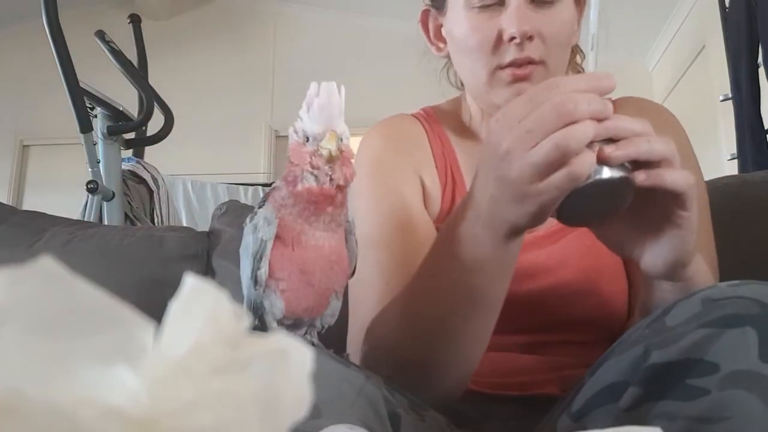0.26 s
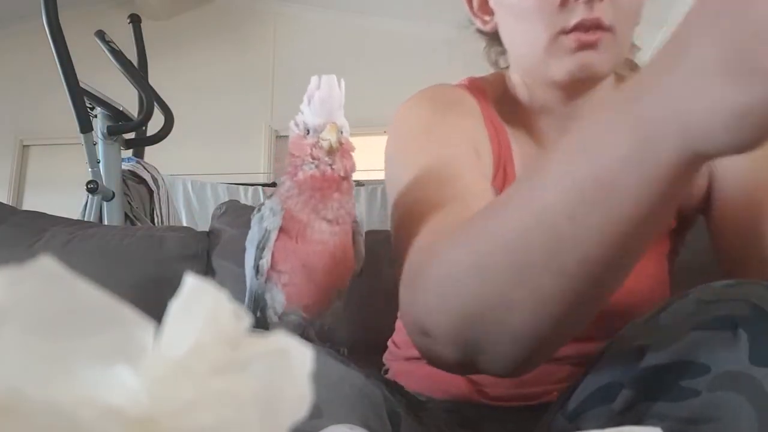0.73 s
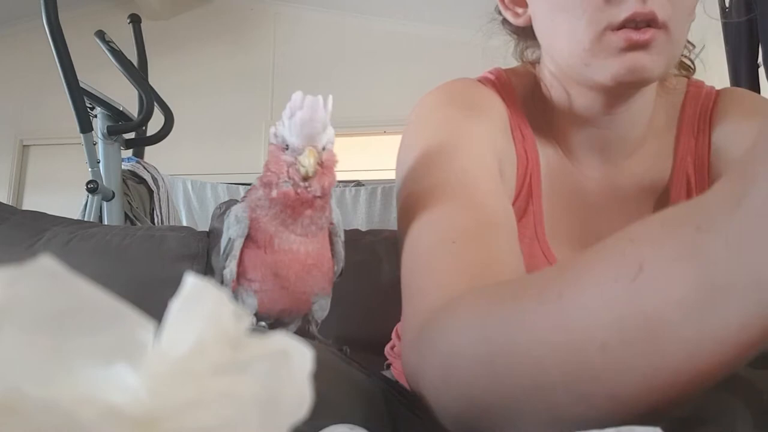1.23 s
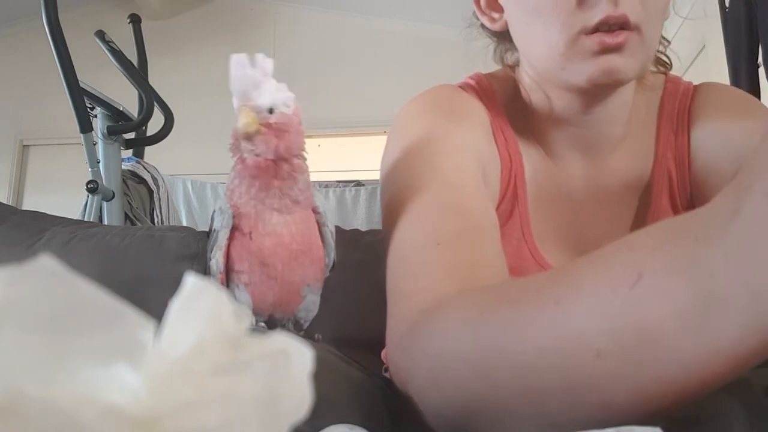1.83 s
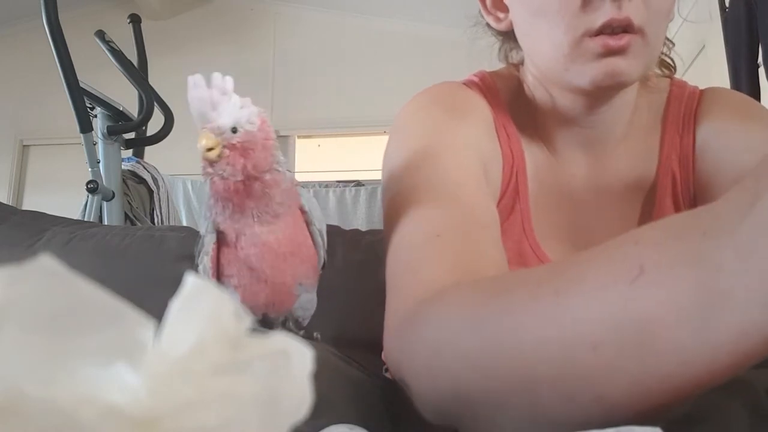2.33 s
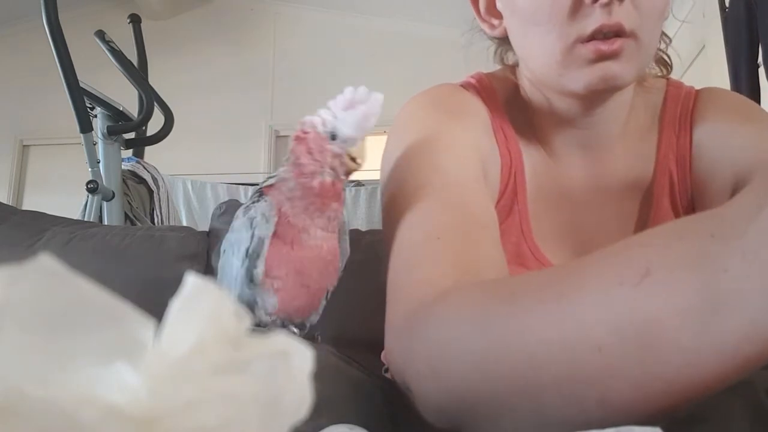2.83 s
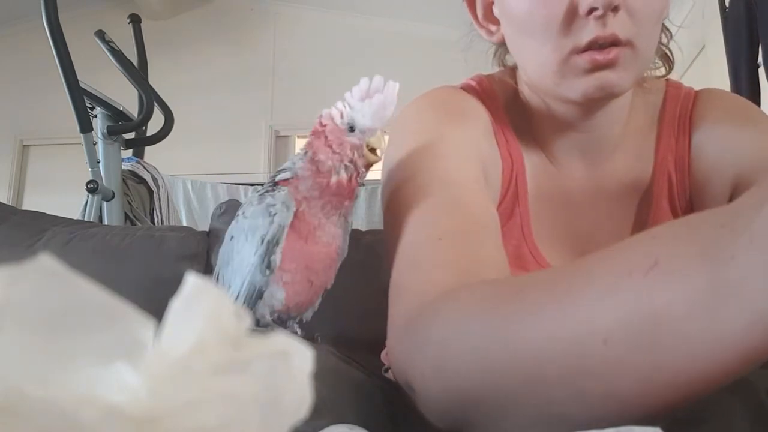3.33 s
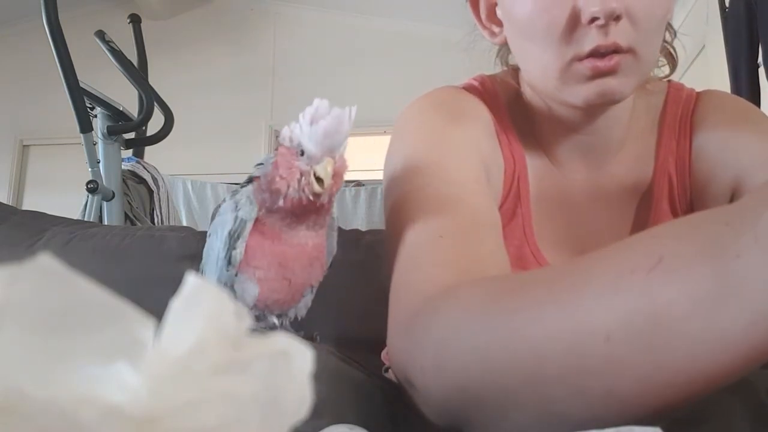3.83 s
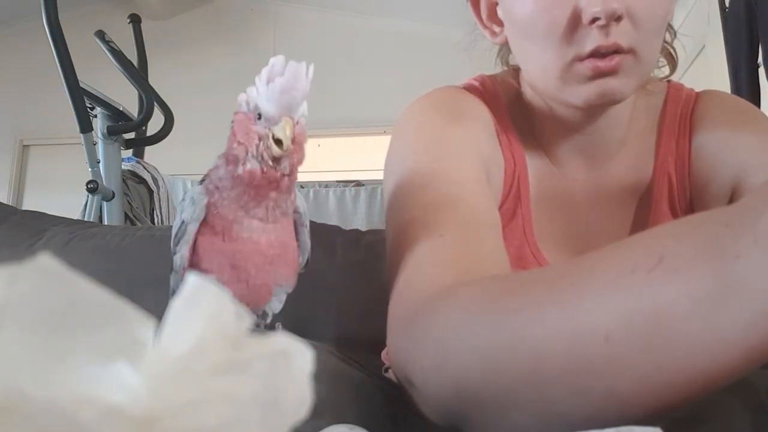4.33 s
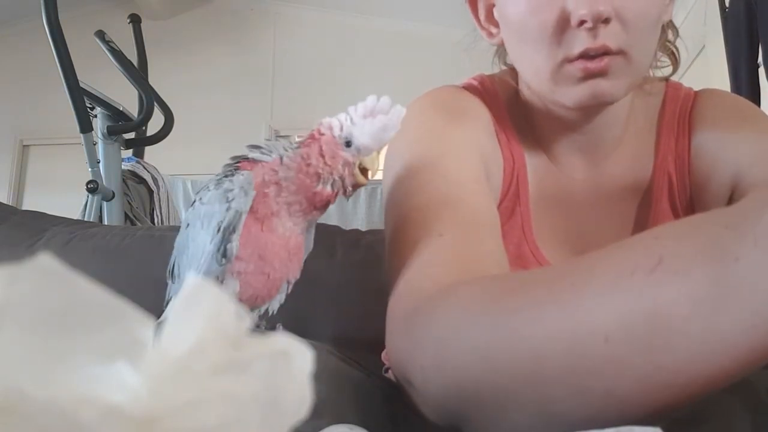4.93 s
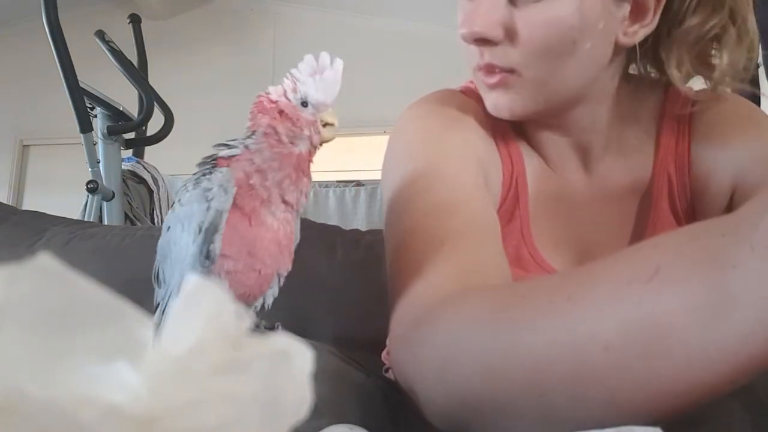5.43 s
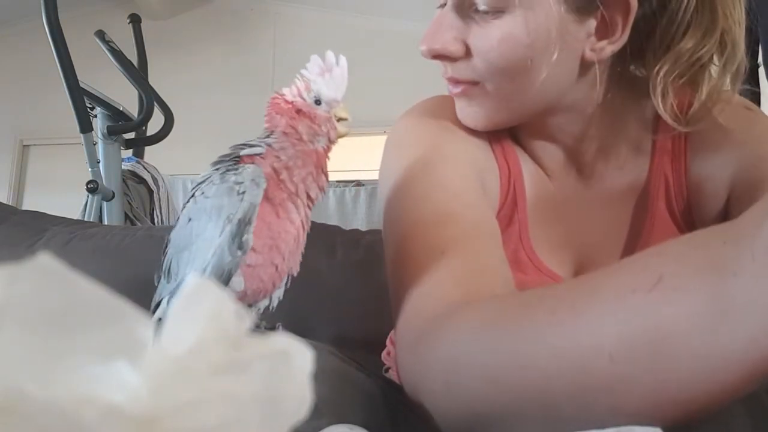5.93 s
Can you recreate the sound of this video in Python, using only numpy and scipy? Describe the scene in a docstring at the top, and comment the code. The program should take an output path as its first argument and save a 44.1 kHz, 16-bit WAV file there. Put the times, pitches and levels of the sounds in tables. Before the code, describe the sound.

Harsh, squeaky begging calls from a young cockatoo run on indoors with brief pauses, joined early by a cup knocking on a table.

```python
"""A young parrot begs in a furnished room, near a microphone with a left and a right port.
Its voice box (the syrinx) either holds a clear falling squeal or catches and stalls in bouts of
short, rough sputters. Now and then it honks low as it breathes in, and it keeps turning its head.
A cup is set down, and a low hum swells once over quiet room noise."""
import sys
import numpy as np
from scipy import signal
from scipy.fft import rfft, irfft, next_fast_len
from scipy.io import wavfile
from scipy.ndimage import uniform_filter1d, map_coordinates

SR = 44100
rng = np.random.default_rng(int(sys.argv[2]) if len(sys.argv) > 2 else 0)


def log_audio(samples):
    """Write samples as a 16-bit WAV file to the path given in sys.argv[1]."""
    # one column per channel
    frames = np.atleast_2d(samples).T
    # limit to full scale, then quantise
    limited = np.clip(frames, -1, 1)
    pcm = np.round(limited * 32767).astype(np.int16)
    wavfile.write(sys.argv[1], SR, pcm)


N = 272097

# Held notes. The four levels are for harmonic 1 (the base), 2 (the octave), 3-5 (the beak) and the rest:
# start_s, length_s, first_hz, last_hz, base_db, octave_db, beak_db, treble_db, beak_fade_db, beak_hz
SQUEALS = [ (0.516, 0.077, 859, 847.6, -27.5, -24.5, -28, -44.5, 9, 2720),
           (0.6, 0.037, 832, 854, -26.5, -24, -30.5, -46.5, 12, 2660),
           (0.666, 0.057, 858, 861, -26, -26.5, -25, -39.5, 4, 2830),
           (1.568, 0.046, 873, 834, -25, -27.5, -24, -35.5, -2, 2600),
           (1.938, 0.055, 841.5, 827.4, -27.5, -35, -23, -37.5, -4.5, 2520),
           (2.077, .02, 834, 823, -27.5, -33, -21, -46, 6, 2670),
           (2.105, 0.033, 831, 822, -26.5, -36, -20.5, -40.5, 1, 2660),
           (2.191, 0.049, 871, 821, -26, -29.5, -18.5, -36.5, 6, 2730),
           (2.452, .071, 945.4, 854.7, -23.5, -26, -18.5, -30, 17, 3470),
           (2.689, 0.061, 901, 851, -26, -28.5, -24, -33.5, 6, 3201),
           (2.953, 0.083, 911, 822, -27.5, -32, -22, -35.5, 4.5, 3270),
           (3.118, .15, 849.2, 815.4, -29, -41.5, -23, -37.5, 7.5, 3150),
           (3.445, 0.11, 883.6, 811, -28, -35.5, -27.5, -36.5, 9, 3100),
           (3.848, 0.099, 978.4, 823, -25, -29, -22, -32, 7, 3100),
           (4.073, 0.061, 897, 828.7, -26.5, -33, -22, -35.5, 4, 3230),
           (4.16, 0.024, 848, 830, -28.5, -33.5, -22, -36, 3, 3250),
           (4.226, .077, 890, 832.6, -26, -34, -21, -36, 3.5, 3248),
           (4.348, .076, 865, 832, -26.5, -34.5, -22, -35, 4.5, 3300),
           (4.54, 0.098, 910, 826, -25.5, -31.5, -21.5, -35.5, 0.5, 3122),
           (4.842, 0.085, 916, 832, -24.5, -30, -20, -34.5, 4.5, 3100),
           (5.124, 0.095, 948, 814.6, -25, -32, -22, -33.5, 8.5, 3280),
           (5.552, .032, 905.3, 862, -26.5, -27.5, -25, -38.5, 5, 3399),
           (5.744, 0.024, 910.4, 862, -26.5, -31, -22, -37.5, 10, 2820),
           (6.007, 0.085, 955.6, 841, -25.5, -32.5, -25, -37, 7, 3564)]
# Runs of brief catches of the voice box: start_s, end_s, pitch_hz, level_db
BOUTS = [(0.057, 0.124, 811, -31), (0.126, 0.19, 945, -30.5), (.281, 0.351, 958, -29.5),
         (.368, 0.428, 1014, -30.5), (0.494, .496, 995, -36), (0.501, .512, 915, -31),
         (0.641, 0.656, 877, -32), (.728, 0.732, 930, -35), (0.94, 0.951, 742, -34),
         (0.946, 0.995, 842, -29.5), (1.01, 1.034, 818, -27), (1.042, 1.055, 843.4, -27),
         (1.235, 1.297, 803, -28), (1.319, 1.362, 857.4, -26.5), (1.494, 1.56, 822, -28),
         (1.623, 1.636, 793, -28), (1.692, 1.81, 883, -27), (1.812, 1.931, 836, -26.5),
         (2.001, 2.058, 836.5, -28), (2.143, 2.186, 1050, -32.5), (2.42, 2.423, 1217, -26),
         (2.445, 2.452, 1100, -22.5), (2.529, 2.532, 1219, -28.5), (2.551, 2.561, 1092, -25),
         (2.577, 2.616, 1143, -28.5), (2.625, 2.664, 1095, -25.5), (2.677, 2.688, 1052, -25.5),
         (3.041, 3.047, 892, -34), (2.802, 2.823, 1043, -28.5), (2.83, 2.849, 1151, -27.5),
         (2.858, 2.871, 1093, -27), (2.932, 2.936, 1149, -24.5), (3.108, 3.119, 1050, -26),
         (3.272, 3.275, 915, -30), (3.283, 3.301, 832.5, -29.5), (3.313, 3.333, 952, -30),
         (3.345, 3.359, 870, -28), (3.39, 3.395, 1110, -30.5), (3.419, 3.439, 1081, -29),
         (3.56, 3.638, 1095, -30), (3.64, 3.678, 891.6, -29), (3.95, 3.958, 964, -29.5),
         (3.974, 4.024, 1125, -32), (4.051, 4.066, 1050, -27), (4.139, 4.151, 1050, -27.5),
         (4.192, 4.221, 1112, -30.5), (4.306, 4.347, 1120, -31), (4.43, 4.461, 994, -28.5),
         (4.651, 4.67, 1009, -28.5), (4.694, 4.7, 1083, -29.5), (4.715, 4.727, 1093, -26.5),
         (4.74, 4.762, 1077, -27), (5.117, 5.12, 1096, -30.5), (5.223, 5.257, 1082, -29.5),
         (5.275, 5.281, 1225, -37), (5.294, 5.307, 1127, -29.5), (5.318, 5.325, 1090, -29),
         (5.341, 5.367, 1117, -29.5), (5.375, 5.42, 1126, -31), (5.434, 5.452, 1065, -28.5),
         (5.472, 5.508, 1086, -27), (5.526, 5.549, 1080, -27), (5.592, 5.636, 1090, -27.5),
         (5.648, 5.738, 1093, -29), (5.773, 5.862, 1025, -26.5), (6.091, 6.131, 1124, -33.5),
         (6.139, 6.163, 896, -36)]
# The sputters' tone as neck and beak move; levels are relative to the base tone:
# time_s, octave_db, beak_db, treble_db, half_pitch_db, roughness, beak_hz, beak_width_hz
RASP = [(0, -2, -12, -28, -7, 0.1, 2500, 494), (.15, -2, -0.5, -22, -17.5, 0.65, 2740, 536),
        (.4, -2.5, -1.5, -25.5, -12, 0.7, 2700, 600), (.65, 4.5, 2, -17.5, -8, 0.62, 2700, 900),
        (.97, -13, -26, -36, -22.5, 0.31, 2477, 500), (1.05, -4.5, -1.5, -23.5, -28, 0.42, 2550, 696),
        (1.25, -13.5, -19.5, -26.5, -21.5, 0.3, 2520, 600), (1.55, -16, -13.5, -27, -18, 0.31, 2550, 700),
        (1.85, -5, -13, -24, -19.5, 0.35, 2360, 1050), (2.03, -1, 1, -15, -17.5, 0.57, 3000, 1550),
        (2.42, -9, -0.5, -19.5, -21, 0.66, 3200, 1260), (2.6, -26, -4.5, -21, -24.5, .55, 2996, 680),
        (2.9, -16, -6.5, -19.5, -31, 0.57, 2991, 700), (3.3, -10.5, -3, -14, -22.5, 0.45, 3055, 774),
        (4.0, -21, -4, -19.5, -24, 0.71, 2960, 846), (5.3, -38, -1.5, -19, -21.5, 0.6, 3150, 443),
        (5.7, -15, -3.5, -20, -33, .55, 2900, 596), (6.17, -23, 0.5, -16, -17, .45, 3255, 800)]
# Breath noise below the beak's resonance: frequency_hz, gain_db
WHEEZE = [(200, -24), (400, -21), (700, -1), (1100, 1.5), (1500, -8), (2200, -1.5)]
# How the throat shapes the treble: frequency_hz, gain_db
THROAT = [(5000, -4), (6000, -2.5), (7500, -8), (9500, -7), (11500, -9), (13500, -8.5), (15700, -14),
          (16400, -41)]
# Low notes on the in-breath: start_s, length_s, first_hz, last_hz, level_db
HONKS = [(.005, 0.04, 329, 300, -32), (0.227, 0.043, 331, 293.5, -31.5), (0.772, 0.08, 317, 316.5, -31.5)]
# The harmonics of a honk: pitch_multiple, gain_db
HONK_HARMONICS = [(1, -5), (2, 0), (3, 1), (4, -0.5), (5, -6), (6, -6.5), (7, -6.5), (8, -8.5)]
# The cup meeting the table: start_s, level_db, ring_hz, ring_decay_s, thump_gain_db
KNOCKS = [(0.854, -17.5, 1120, 0.014, -50), (0.891, -24.5, 757, 0.028, -41),
          (1.301, -11.5, 1640, 0.03, -42)]
# How the head moves: time_s, turn_amount, left_delay_ms
HEAD_TURNS = [(0, -1.5, .16), (.7, -1.5, .13), (1.3, -1.5, .16), (2.0, -2.5, .25), (2.5, -2.5, 0.23),
              (3.0, -2.5, .12), (3.7, -1.5, 0.18), (4.2, -2, 0.18), (5.0, -1.5, .12), (5.5, -1.5, .16),
              (6.17, -1.5, .12)]
# Left level minus right level for a turn_amount of 1: frequency_hz, difference_db
HEAD_SHADOW = [(700, -0.18), (1300, -0.37), (2400, 4.5), (4400, 3.5), (8000, 1.7), (15000, 2.45)]
# Echoes from nearby surfaces: left_delay_ms, left_gain_db, right_gain_db
ECHOES = [(1.3, -44, -17), (3.1, -26.5, -34.5), (5.7, -8, -4), (9.2, -1.5, -7), (14.5, 0.5, -42)]
# How long the room takes to fade by 60 dB: frequency_hz, decay_s
ROOM_DECAY = [(400, 0.46), (1000, 0.4), (3000, 0.33), (6000, 0.55), (14000, 0.39)]
# Low noise that swells with the hum: frequency_hz, gain_db
RUMBLE = [(40, -2), (100, 0), (170, 6), (260, -24), (500, -36)]
# Steady room noise: frequency_hz, gain_db
ROOM_NOISE = [(25, -39), (100, -10), (200, -24), (330, 5), (700, -9.5), (2000, -7), (6000, -16),
              (16000, -30.5)]

GLIDE_POWER = 1.6  # a squeal's pitch moves fast at first, then levels off
EFFORT_DB_PER_100_HZ = (5, 11, 8)  # base, octave and treble get louder with pitch
BLOOM_S, BLOOM_DB = 0.0063, 11  # overtones come in just after the base tone
CATCH_S, STALL_S, SPACING_SPREAD = .0145, .0075, .5  # average spacing, pause between, unevenness
STRAY_HZ, SCATTER_DB = 75, .9  # random spread of catch pitch (times roughness) and level
WEAK_START_DB = -3.5  # a long bout starts with a weaker catch
WINDPIPE_HZ, WINDPIPE_DB = 1062.5, 5  # lowest resonance, height of the peaks
HUM_HZ, HUM_DB = 49.4, -78
SWELL_S, SWELL_WIDTH_S, SWELL_DB = 2.27, 0.32, 16
TOP_HZ = 16400


def bird():
    """The whole voice, with the deep bass filtered out."""
    return filtered(squeals() + sputters() + honks(), lambda f: f ** 4 / (f ** 4 + 213.0 ** 4))


def syrinx(t, hz, levels_db, jitter, beak_hz, width_hz, half_db=-80):
    """One membrane vibrates. When every other cycle differs, a tone at half the pitch joins in."""
    k = np.arange(1, 20)[:, None]  # harmonic numbers
    cycles = np.cumsum(hz * (1 + jitter * wobble(len(hz), 300))) / SR + rng.random()
    gain = np.where(k < 6, beak(k * hz, beak_hz, width_hz), throat(k * hz) * (k * hz < TOP_HZ))
    # Each overtone wavers a little in loudness.
    offset_db = rng.normal(0, .8, k.shape)
    sway_db = np.sin(rng.uniform(0, 7, k.shape) + rng.uniform(40, 120, k.shape) * t)
    gain = gain * amp((offset_db + sway_db) * np.minimum(.4 * (k - 1), 4))
    tones = np.sqrt(2) * gain * np.cos(2 * np.pi * k * cycles + 0.66 * k * k)
    groups = [slice(0, 1), slice(1, 2), slice(2, 5), slice(5, None)]  # base, octave, beak, treble
    note = sum(amp(db) * tones[g].sum(axis=0) / np.sqrt((gain[g] ** 2).sum(axis=0))
               for g, db in zip(groups, levels_db))
    return note * (1 + 2 * amp(half_db) * np.cos(np.pi * cycles))


def squeals():
    """Steady, breathy notes. As effort slackens, pitch, loudness and brightness fall together."""
    out = np.zeros(N)
    breath = unit(filtered(rng.standard_normal(N), lambda f: throat(f) * f ** 4 / (f ** 4 + 4500.0 ** 4)))
    _, t = span(0, 0.1)  # one squeal is already dying away at the start
    dying = syrinx(t, np.full_like(t, 858), (-50, -51, -28.5, -51), 0.01, *RASP[0][-2:])
    out[:len(t)] = amp(-384 * t) * dying
    for start, length, first_hz, last_hz, base_db, octave_db, beak_db, treble_db, fade_db, beak_hz \
            in SQUEALS:
        first, t = span(start - .002, start + length + 0.0018)
        remaining = np.clip(1 - (t - start) / length, 0, 1)
        hz = last_hz + (first_hz - last_hz) * remaining ** GLIDE_POWER
        base_lift, octave_lift, treble_lift = np.outer(EFFORT_DB_PER_100_HZ, hz - hz.mean()) / 100
        late_db = BLOOM_DB * np.exp(-(t - t[0]) / BLOOM_S)
        beak_db = beak_db + fade_db * (remaining - .5) - late_db
        treble_db = treble_db + treble_lift - late_db
        levels_db = [base_db + base_lift, octave_db + octave_lift - late_db, beak_db, treble_db]
        half_db = curves(RASP, t)[3] - 15
        jitter = .0012 + .06 * amp(half_db)
        note = syrinx(t, hz, levels_db, jitter, beak_hz, width_hz=1050, half_db=half_db)
        note += amp(treble_db - 12) * breath[first:first + len(t)]
        flutter = amp(20 * amp(half_db) * wobble(len(t), 137))
        out[first:first + len(t)] += edges(t, 0.0036, 0.0012) * flutter * note
    return out


def catches():
    """The voice box catches and stalls unevenly through a bout. Gives start_s, end_s, pitch_hz, level_db."""
    rows = []
    for start, end, hz, db in BOUTS:
        count = max(round((end - start) / CATCH_S), 1)
        spacing, stray, strength = rng.standard_normal((3, 40))[:, :count]
        marks = np.cumsum([0, *np.exp(SPACING_SPREAD * spacing)])
        marks = start + (end - start + STALL_S) * marks / marks[-1]
        rough = curves(RASP, marks[:-1])[4]
        levels_db = db + SCATTER_DB * strength
        if count > 3:
            levels_db[0] += WEAK_START_DB
        rows += zip(marks[:-1], marks[1:] - STALL_S, hz + STRAY_HZ * rough * stray, levels_db)
    return rows


def sputters():
    """Each catch is a rough scrap of tone that swells and dies within a few cycles."""
    tone, opening = np.zeros(N), np.zeros(N)
    for start, end, hz, db in catches():
        first, t = span(start - .0015, max(end, start + .003) + .0035)
        octave_db, beak_db, treble_db, half_db, rough, beak_hz, width_hz = curves(RASP, t)
        rough = np.clip(rough, 0, .6)
        shape = amp(db) * edges(t, 0.0022, 0.0039)
        levels_db = [0, octave_db, beak_db - 3 * rough, treble_db - 4 * rough]
        jitter = .1 * rough ** 1.5
        note = syrinx(t, np.full_like(t, hz), levels_db, jitter, beak_hz, width_hz, half_db)
        flutter = amp(2.5 * rough * wobble(len(t), 350))
        tone[first:first + len(t)] += shape * flutter * note
        opening[first:first + len(t)] += shape
    return tone + leaking_air(opening)


def leaking_air(opening):
    """Swirling air hisses through the voice box during each catch and just after it."""
    _, beak_db, treble_db, _, rough, *_ = curves(RASP, np.arange(N) / SR)
    noise = rng.standard_normal((3, N))
    low = amp(-4) * unit(filtered(noise[0], lambda f: amp(along(WHEEZE, f)) * (f < 2200)))
    hz, times, spectrum = signal.stft(noise[1], SR, nperseg=256)
    beak_gain = beak(hz[:, None], *curves(RASP, times)[-2:]) * (abs(hz[:, None] - 3600) < 1400)
    middle = amp(beak_db - 1) * unit(signal.istft(spectrum * beak_gain, SR, nperseg=256)[1][:N])
    high = amp(treble_db + 3.5) * unit(filtered(noise[2], lambda f: throat(f) * (f > 4800)))
    lingering = signal.lfilter([1 / 500], [1, 1 / 500 - 1], opening)  # trails by about 11 ms
    wheeze = (.68 * opening + .33 * lingering) * (low + middle)
    hiss = (.8 * opening + .15 * lingering) * high
    return np.sqrt(np.clip(rough, 0, .6)) * (wheeze + hiss)


def honks():
    """A slacker, lower vibration as air is drawn back in."""
    out = np.zeros(N)
    k, gain_db = np.transpose(HONK_HARMONICS)[..., None]
    for start, length, first_hz, last_hz, db in HONKS:
        first, t = span(start, start + length)
        hz = np.linspace(first_hz, last_hz, len(t))
        cycles = np.cumsum(hz * (1 + 0.026 * wobble(len(t), 257))) / SR
        tones = amp(gain_db) * np.cos(2 * np.pi * k * cycles + 2.1 - 0.373 * k ** 2)
        out[first:first + len(t)] += edges(t, 0.012, 0.0085) * amp(db) * unit(tones.sum(axis=0))
    return out


def beak(hz, centre_hz, width_hz):
    """The beak resonates: it favours frequencies near centre_hz."""
    return 1 / (1 + (2 * (hz - centre_hz) / np.maximum(width_hz, 200)) ** 2) ** .55


def throat(hz):
    """Treble gain. The windpipe, a tube closed at one end, favours odd multiples of WINDPIPE_HZ."""
    return amp(along(THROAT, hz) - WINDPIPE_DB * np.cos(np.pi * hz / WINDPIPE_HZ))


def cup():
    """Each knock is a short dull ring, a puff of noise and a low thump of the table."""
    out, t = np.zeros(N), np.arange(SR // 5) / SR
    for start, db, hz, decay_s, thump_db in KNOCKS:
        ring = np.sin(2 * np.pi * hz * t) * amp(-60 * t / decay_s)
        ring += 0.093 * np.sin(2 * np.pi * 360 * t) * amp(-60 * t / 0.056)
        noise = np.diff(uniform_filter1d(rng.standard_normal(len(t) + 1), size=12))
        puff = 1.08 * noise * amp(-60 * t / 0.0058)
        thump = amp(thump_db - 60 * t / 0.19) * np.sin(2 * np.pi * 105 * t)
        attack = 1 - np.exp(-t / 0.001)
        out[round(start * SR):][:len(t)] += amp(db) * attack * (ring + puff + thump)
    return out


def microphone_ports(x):
    """The left port hears later and duller, by an amount that changes as the head turns."""
    hz, times, spectrum = signal.stft(x, SR, nperseg=256)
    turn, delay_ms = curves(HEAD_TURNS, times)
    left = amp(along(HEAD_SHADOW, hz)[:, None] * turn / 2)  # each port takes half the difference
    left = left * np.exp(-1j * np.pi * hz[:, None] * delay_ms / 1000)
    return signal.istft(np.array([spectrum * left, spectrum / left]), SR, nperseg=256)[1][:, :N]


def room(x):
    """Nearby surfaces echo first, then comes a tail in which each frequency dies at its own speed."""
    early = np.zeros((2, SR // 20))
    for ms, left_db, right_db in ECHOES:
        early[0, round(ms * SR / 1000)] = amp(left_db)
        early[1, round(ms * 1.07 * SR / 1000)] = amp(right_db)
    hz, t, spectrum = signal.stft(rng.standard_normal((2, SR // 2)), SR, nperseg=256)
    tail = signal.istft(spectrum * amp(-60 * t / along(ROOM_DECAY, hz)[:, None]), SR, nperseg=256)[1]
    response = np.pad(amp(-11.0) * tail / np.linalg.norm(tail[0]), [(0, 0), (500, 0)])
    response[:, :early.shape[1]] += amp(-11.5) * early
    return signal.fftconvolve(x, response, axes=1)[:, :N]


def hum():
    """A low tone and a rumble swell once and fade, the same in both ports."""
    t = np.arange(N) / SR
    level_db = HUM_DB + SWELL_DB * np.exp(-.5 * ((t - SWELL_S) / SWELL_WIDTH_S) ** 2)
    tone = np.sqrt(2) * amp(level_db + 1.5 * wobble(N, 6.3)) * np.sin(2 * np.pi * HUM_HZ * t)
    rumble = unit(filtered(rng.standard_normal(N), lambda f: amp(along(RUMBLE, f))))
    return tone + amp(level_db - 2.5) * rumble


def room_noise():
    """A quiet, steady rush whose bass is nearly alike in both ports."""
    def gains(f):
        return amp(along(ROOM_NOISE, f)) * [np.ones_like(f), .5 * f / (f + 150)]
    shared, side = filtered(rng.standard_normal((2, N)), gains)
    return amp(-59.0) * (shared + np.outer([1, -1], side)) / np.std(shared)


def amp(db):
    """Turn decibels into a multiplier."""
    return 10 ** (np.asarray(db) / 20)


def unit(x):
    """Scale x to an average power of 1."""
    return x / np.sqrt(np.mean(x ** 2) + 1e-20)


def along(points, hz):
    """Read a table at hz, on a log frequency scale."""
    frequencies, values = np.transpose(points)
    return np.interp(np.log(hz + 1), np.log(frequencies + 1), values)


def curves(rows, t):
    """Read each column after time_s at the times t."""
    times, *columns = np.transpose(rows)
    return [np.interp(t, times, column) for column in columns]


def span(start, end):
    """The first sample of a stretch, and all its times."""
    first = max(round(start * SR), 0)
    return first, np.arange(first, min(round(end * SR), N)) / SR


def edges(t, rise_s, fall_s):
    """Fade a note in and out."""
    ramp = np.minimum((t - t[0]) / rise_s, (t[-1] - t) / fall_s)
    return np.sin(np.pi / 2 * np.clip(ramp, 0, 1)) ** 2


def wobble(size, rate):
    """A smooth curve through `rate` random points a second."""
    points = rng.standard_normal(int(size * rate / SR) + 4)
    return map_coordinates(points, [np.arange(size) * rate / SR])


def filtered(x, gain):
    """Multiply each frequency in x by gain(hz)."""
    size = next_fast_len(N + 8192)
    return irfft(rfft(x, size) * gain(np.fft.rfftfreq(size, 1 / SR)), size)[..., :N]


def scene():
    """The bird and the cup, their echoes and the background."""
    direct = microphone_ports(bird() + cup())
    return direct + room(direct) + hum() + room_noise()


def record(dry):
    """Round off the loudest peaks and cut everything above TOP_HZ."""
    rounded = dry / (1 + abs(dry / .93) ** 8) ** (1 / 8)
    return filtered(rounded, lambda hz: hz < TOP_HZ)


dry = scene()
out = record(dry)
log_audio(out)
```